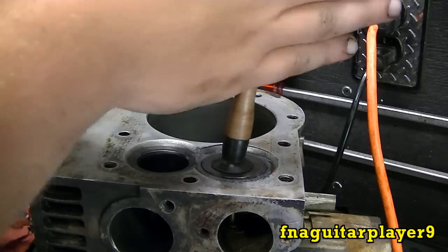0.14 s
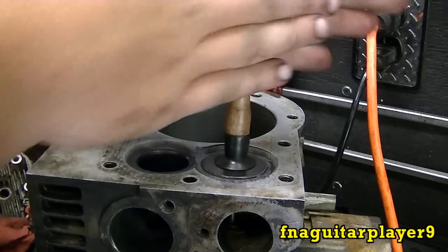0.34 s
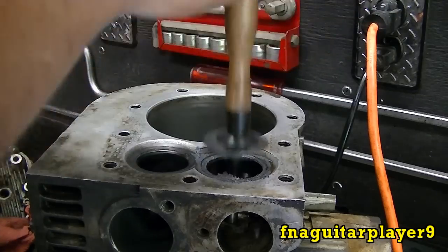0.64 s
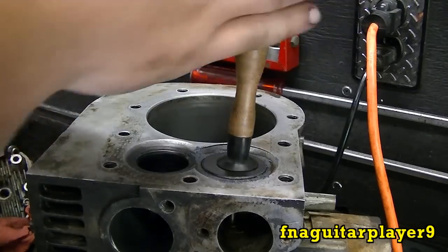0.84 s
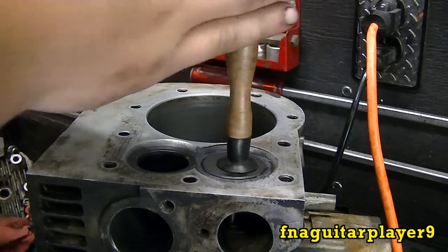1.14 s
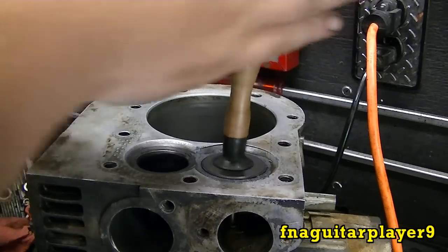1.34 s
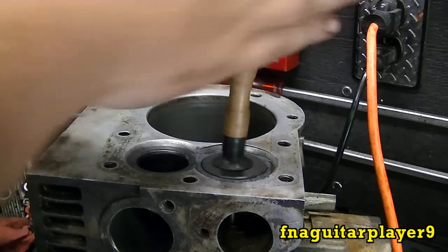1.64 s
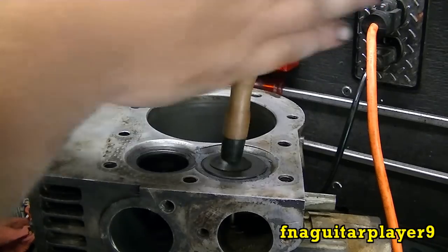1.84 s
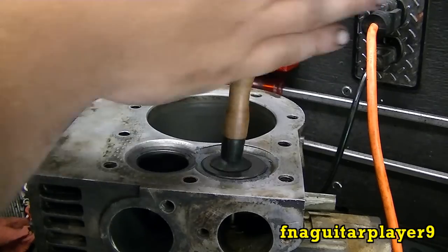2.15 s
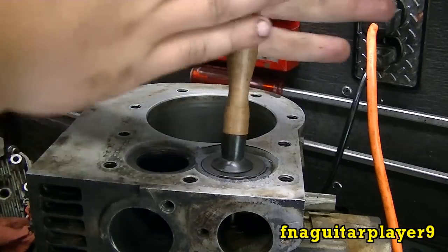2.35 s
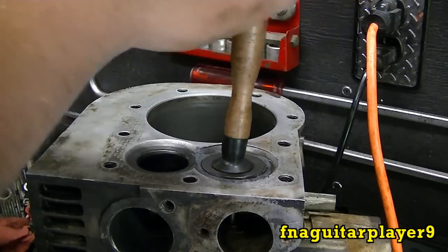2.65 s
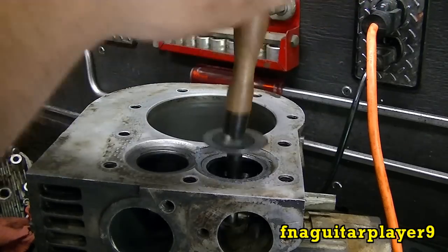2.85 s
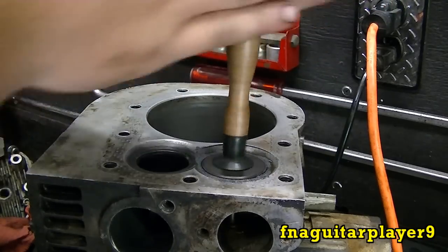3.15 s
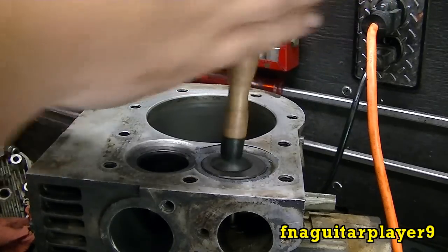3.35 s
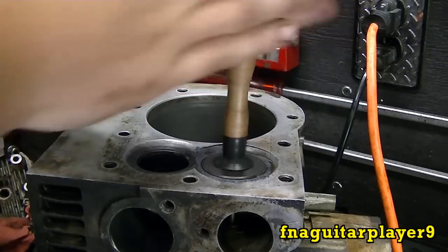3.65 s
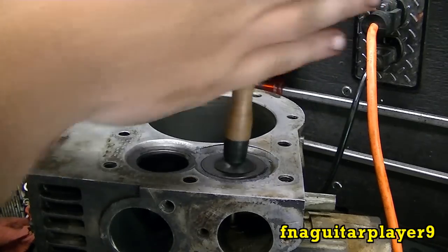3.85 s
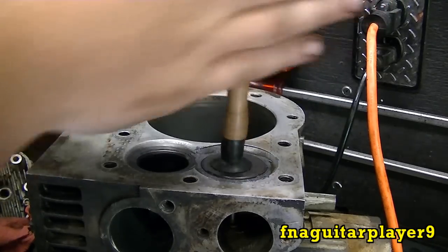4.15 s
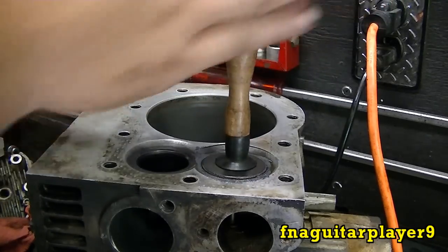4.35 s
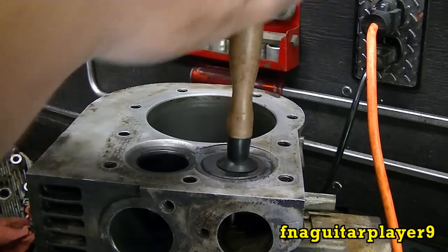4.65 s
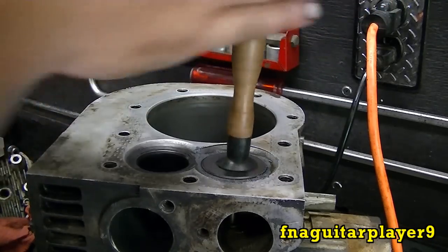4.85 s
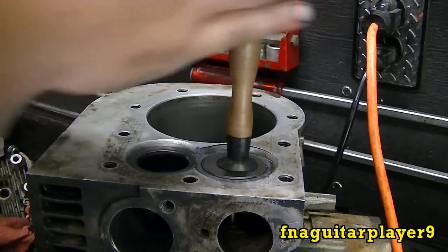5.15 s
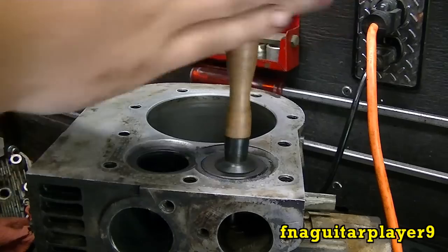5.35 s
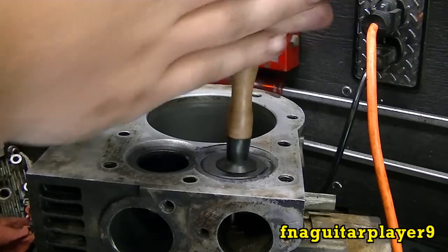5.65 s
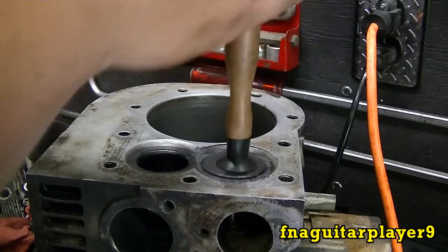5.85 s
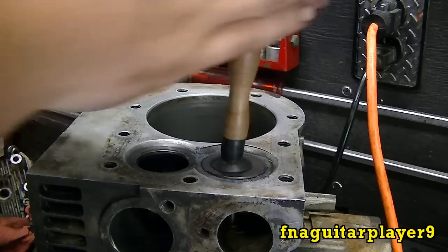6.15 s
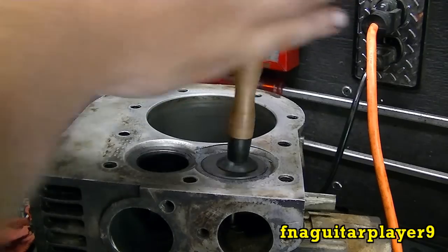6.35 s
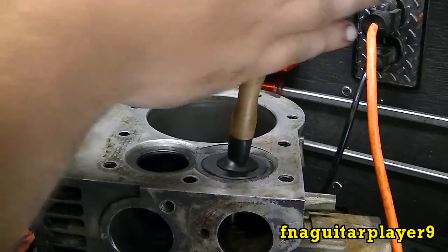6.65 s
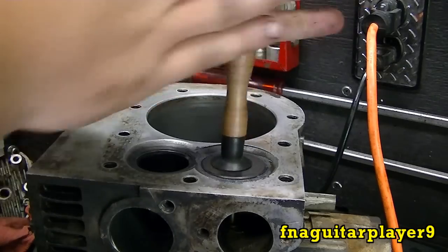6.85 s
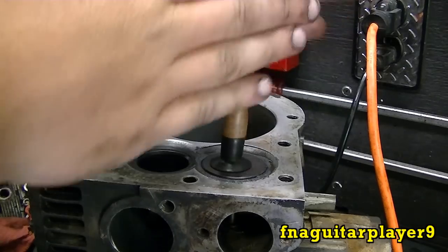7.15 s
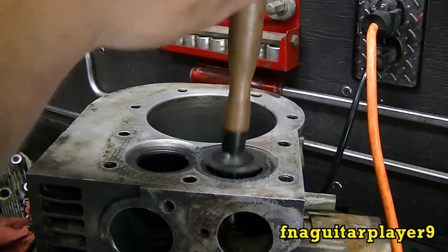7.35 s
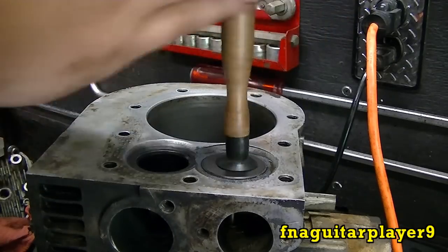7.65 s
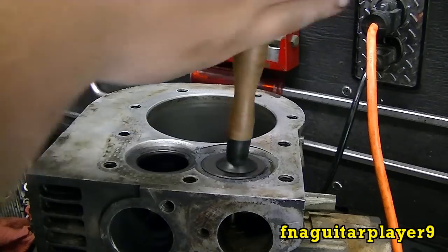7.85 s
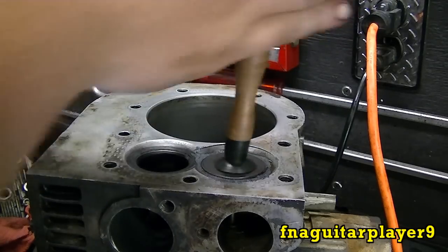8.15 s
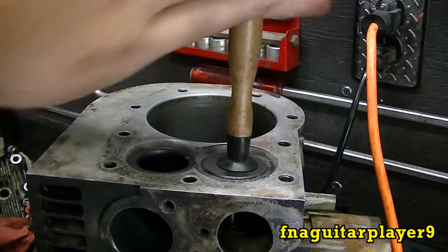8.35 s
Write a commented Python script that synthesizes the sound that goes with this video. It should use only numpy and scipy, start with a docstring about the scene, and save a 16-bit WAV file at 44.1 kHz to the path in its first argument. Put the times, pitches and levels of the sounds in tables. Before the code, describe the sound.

Close up in a small workshop, a valve is twisted back and forth on gritty paste, about seven or eight rasping strokes a second, with a ringing metallic edge. Every second or so the grinding stops; the valve lifts with soft knocks, its stem hisses in the guide, and it drops with a hard clack before the rasping resumes. Short room echoes, quiet air and a faint hum lie beneath.

```python
"""A gritty rasp swings back and forth: a stick spun between the palms laps an engine valve into its seat.
Each half turn crushes abrasive grit, which makes the valve and the block ring. Between bouts the valve
is lifted with soft knocks, its stem hisses along the guide, and it clacks back on to the seat.
Random grains and noise pass through filters shaped like the metal; short groans and chirps, a small
workshop's echoes, its still air and a faint hum are added. Both channels carry the same sound."""
import sys
import numpy as np
from scipy import signal
from scipy.fft import rfft, irfft
from scipy.io import wavfile
from scipy.ndimage import uniform_filter1d, minimum_filter1d

SR = 44100
rng = np.random.default_rng(int(sys.argv[2]) if len(sys.argv) > 2 else 0)


def generate_wav(signal):
    """Clip the signal to [-1, 1] and save it as 16-bit WAV at the path in sys.argv[1]."""
    frames = np.transpose(np.atleast_2d(signal))
    scaled = np.clip(frames, -1, 1) * 32767
    pcm = np.round(scaled).astype(np.int16)
    wavfile.write(sys.argv[1], SR, pcm)


N = 374850
TIME = np.arange(N) / SR  # s
SIZE = 16384  # samples in a filter response
HZ = np.maximum(np.arange(SIZE // 2 + 1) * SR / SIZE, 1)  # frequencies of the gain curves


def from_db(db):
    """Turn decibels into an amplitude factor."""
    return 10 ** (np.asarray(db) / 20)


def rms_one(x):
    """Scale a signal to an rms level of 1."""
    return x / np.sqrt(np.mean(x ** 2) + 1e-20)


def colour(points):
    """Gain at each frequency, drawn through (frequency [Hz], level [dB]) points."""
    hz, db = np.transpose(points)
    return from_db(np.interp(np.log(HZ), np.log(hz), db))


def above(edge_hz):
    """Gain of a steep high-pass."""
    return 1 / np.sqrt(1 + (edge_hz / HZ) ** 20)


def below(edge_hz):
    """Gain of a steep low-pass."""
    return 1 / np.sqrt(1 + (HZ / edge_hz) ** 20)


def sound_through(force, gain):
    """Filter that reacts as early as its gain curve allows (minimum phase); white noise keeps its power."""
    cepstrum = irfft(np.log(gain / gain.max() + 1e-5))
    # fold the second half on to the first, so that nothing sounds before its cause
    cepstrum[1:SIZE // 2] *= 2
    cepstrum[SIZE // 2 + 1:] = 0
    response = irfft(np.exp(rfft(cepstrum)))
    response = response / np.linalg.norm(response)
    return signal.oaconvolve(force, response)[:N]


def drift(rate):
    """Smooth random wandering: a new random value this many times a second, joined by straight lines."""
    knots = rng.standard_normal(N // 40)
    return np.interp(TIME * rate, np.arange(len(knots)), knots)


def grit(per_s, spread_db):
    """Grains crack at random moments, most small and a few large; rms 1."""
    sizes = from_db(spread_db * np.minimum(rng.exponential(1, N), 4))
    cracks = rng.random(N) < per_s / SR
    push_or_pull = rng.choice([-1, 1], N)
    return rms_one(cracks * sizes * push_or_pull)


def burst(start, rise_s, t60):
    """Envelope that rises, then dies away by 60 dB in t60 seconds."""
    age = np.clip(TIME - start, 0, 1)
    return (1 - np.exp(-age / rise_s)) * from_db(-60 * np.minimum(age / t60, 3))


def swelling(middle, length):
    """Bell-shaped envelope."""
    return np.exp(-np.minimum(((TIME - middle) / length) ** 2, 20))


def roaming(force, centres_hz, roam_db, rate):
    """The contact wanders, so each region of the spectrum is driven more, then less."""
    out = force
    for hz in centres_hz:
        band = signal.lfilter(*signal.iirpeak(hz, 4, fs=SR), force)
        wander_db = roam_db * np.clip(drift(rate), -2, 2)
        out = out + band * (from_db(wander_db) - 1)
    return rms_one(out)


# colour of the still air in the shop: (frequency [Hz], level [dB])
AIR_COLOUR = [(25, -35.5), (38, -21), (55, 0.5), (95, -1), (130, 4), (185, 3.5), (300, 4), (600, -3),
              (1400, -5), (3000, -8.5), (8000, -16), (11000, -19.5), (15500, -31)]


def still_air(air_db=-68):
    """The still air of the shop: steady coloured noise."""
    return from_db(air_db) * sound_through(rng.standard_normal(N), colour(AIR_COLOUR))


# faint steady tones in the shop: (frequency [Hz], rms level [dB])
HUM_TONES = [(60, -84), (95, -83), (180, -79), (378, -85)]


def hum():
    """Steady sine tones; the root of 2 turns an rms level into a peak."""
    return sum(np.sqrt(2) * from_db(db) * np.sin(2 * np.pi * hz * TIME) for hz, db in HUM_TONES)


# colour of the room's answer: (frequency [Hz], level [dB])
WALL_COLOUR = [(100, 9.5), (500, 7.5), (1500, -2), (4000, 2.5), (8000, -5), (15000, -10.5)]


def workshop(x, early_db=-12.5, early_t60=0.094, late_db=-14.0, late_t60=0.28):
    """Scattered reflections from bench and wall, then a short diffuse tail: two fading bursts of noise."""
    t = TIME[:SR]
    answer = 0
    for db, t60, first_s in ((early_db, early_t60, .004), (late_db, late_t60, .012)):
        echoes = rng.standard_normal(len(t)) * from_db(-60 * t / t60) * (t > first_s)
        answer = answer + from_db(db) * echoes / np.linalg.norm(echoes)
    walls = colour(WALL_COLOUR)
    wall_level = np.sqrt(np.mean(walls ** 2))  # puts back the level that the filter evens out
    return sound_through(signal.oaconvolve(x, answer)[:N], walls) * wall_level


def palms(hard_db=1.5, rock_db=-63, rock_at=0.4, rock_s=.03):
    """Half turns pressed at least this hard rock the block: a faint low thud, part of the way through."""
    push = sum(from_db(rock_db + force_db) * swelling(start + rock_at * (end - start), rock_s)
               for start, end, force_db, swell_db in HALF_TURNS if force_db >= hard_db)
    thud_colour = colour([(10, 1.5), (35, -2), (80, -3.0), (160, -14), (600, -40)])
    return sound_through(push * rng.standard_normal(N), thud_colour)


# the rubber cup groans as it twists on the valve:
# (middle [s], half length [s], frequency [Hz], level before a shared trim [dB])
CUP_GROANS = [(.98, .016, 255, -53), (1.16, 0.045, 375, -52.5), (1.35, 0.019, 232, -51),
              (3.1, 0.051, 370, -51), (3.23, .02, 322, -50)]
# the stem sings briefly in its guide:
# (middle [s], half length [s], frequency [Hz], level before a shared trim [dB])
STEM_CHIRPS = [(5.97, 0.009, 4050, -60), (7.43, 0.015, 4100, -49.5)]


def rubbing(rows, width_hz, rub_db):
    """Stick and slip, made from noise, swell and fade in one narrow resonance."""
    out = 0
    for middle, length, hz, db in rows:
        slips = rng.standard_normal(N) * swelling(middle, length) * from_db(db + rub_db)
        resonance = 1 / (1 + (2 * (HZ - hz) / width_hz) ** 2)
        out = out + sound_through(slips, resonance)
    return out


# resonances of valve and block: (frequency [Hz], width [Hz], height above the broad response [dB])
ENGINE_RESONANCES = [(843.0, 36.0, 18.0), (1391.0, 42.0, 25.0), (1442.0, 54.0, 24.5), (1535.0, 70.0, 16.5),
                     (1739.0, 58.0, 15.5), (1966.0, 106.0, 11.5), (2096.0, 70.0, 9.8), (2499.0, 30.0, 8.4),
                     (2790.0, 44.0, 11.5), (3126.0, 55.0, 11.0), (3231.0, 24.0, 3.8), (3315.0, 65.0, 6.8),
                     (3871.0, 24.0, 8.0), (3972.0, 33.0, 10.8), (4045.0, 73.0, 12.7), (4352.0, 24.0, 5.6),
                     (4424.0, 110.0, 5.9), (4966.0, 81.0, 5.3), (5343.0, 29.0, 6.4), (5455.0, 37.0, 6.6),
                     (5905.0, 105.0, 6.6), (6731.0, 34.0, 9.9), (6956.0, 162.0, 5.0), (7296.0, 28.0, 7.2),
                     (7547.0, 74.0, 5.9), (7768.0, 136.0, 6.7), (7900.0, 50.0, 7.7), (9668.0, 78.0, 5.4),
                     (13757.0, 346.0, 9.3)]
# broad response of the metal: (frequency [Hz], level [dB])
METAL_COLOUR = [(150.0, -37.5), (225.0, -34.5), (420.0, -25), (570.0, -30.5), (1000.0, -28.5),
                (1600.0, -24), (2400.0, -17), (3600.0, -20.5), (5600.0, -19), (6500.0, -28),
                (7800.0, -25.5), (9400.0, -24.5), (11000.0, -32.5), (15500.0, -47)]


def engine_gain():
    """Resonance peaks standing on the broad response of the metal."""
    peaks = sum((from_db(2 * db) - 1) / (1 + (2 * (HZ - hz) / width) ** 2)
                for hz, width, db in ENGINE_RESONANCES)
    return colour(METAL_COLOUR) * np.sqrt(np.maximum(1 + peaks, .1))


# soft knocks as the valve pulls free of the paste or nudges its guide:
# (time [s], level before a shared trim [dB])
SOFT_KNOCKS = [(0.533, -50), (0.563, -40.5), (0.59, -44), (0.619, -47), (2.634, -31), (2.761, -52),
               (2.833, -41), (4.538, -48), (5.903, -36), (7.24, -38), (7.362, -36.5)]
# the stem slides up or down its guide: (middle [s], half length [s], level [dB])
STEM_SLIDES = [(0.628, 0.035, -51), (0.722, 0.037, -55.5), (2.893, 0.047, -58), (2.99, 0.04, -61.5),
               (4.597, 0.028, -61), (4.685, 0.03, -55), (5.973, 0.029, -56.5), (6.047, 0.023, -55),
               (7.425, 0.042, -57), (7.522, 0.029, -61)]
# colour of the sliding stem: (frequency [Hz], level [dB])
STEM_COLOUR = [(710, -48), (1200, -30.5), (1610, -12), (2260, -7.5), (2440, -14), (3680, -7.5),
               (3960, -3.5), (4690, -6.5), (5500, -5), (6370, -11.5), (7960, -16), (9620, -9),
               (15000, -22.5)]


def lifts(engine, nudge_db=-4.0):
    """The raised valve knocks softly and its stem hisses along the guide; grains of paste drive both."""
    knocks = sum(from_db(db + nudge_db) * burst(s, rise_s=0.0011, t60=0.058) for s, db in SOFT_KNOCKS)
    slide = sum(from_db(db) * swelling(s, length) for s, length, db in STEM_SLIDES)
    paste = grit(per_s=5000, spread_db=2.6)
    scuff = roaming(paste, np.geomspace(2000, 10000, num=6), roam_db=6.5, rate=66)
    knock_colour = colour([(200, 2), (550, 8.5), (1400, -1), (4000, -3.5), (12000, -2)])
    knocking = sound_through(knocks * paste, engine * knock_colour)
    sliding = sound_through(slide * scuff, colour(STEM_COLOUR))
    return knocking + sliding


# the valve drops on its seat:
# (time [s], strike level before a shared trim [dB], fin ring before a shared trim [dB])
VALVE_DROPS = [(0.7548, -8.5, -18), (3.0212, -11, -34), (4.6935, -12, -31), (6.0793, -9.5, -21),
               (7.5545, -10, -20)]
# colour of a drop against that of the grinding: (frequency [Hz], level [dB])
DROP_COLOUR = [(40, -2), (70, 3), (110, 5.5), (170, 11), (260, 6), (500, -1), (850, 1), (1400, 1),
               (2400, -2), (4000, -3.5), (8000, -3), (15000, 1)]


def drops(engine, clack_db=-1.0, strike_db=2.0, fins_db=1.0, fins_t60=0.11):
    """The valve strikes its seat and settles in a quick rattle of contacts; the cooling fins ring on briefly."""
    strike = np.zeros(N)
    for s, db, ring_db in VALVE_DROPS:
        strike[round(s * SR)] = from_db(db + strike_db)
    settle = sum(from_db(db) * burst(s, rise_s=.0003, t60=.046) for s, db, ring_db in VALVE_DROPS)
    rattle = settle * grit(per_s=7000, spread_db=1.5)
    fins = sum(from_db(ring_db + fins_db) * burst(s, rise_s=0.0045, t60=fins_t60)
               for s, db, ring_db in VALVE_DROPS)
    fin_colour = colour([(1400, -9.0), (2300, 2), (3700, 1.5), (7000, -13.0), (12000, -17)])
    clack = sound_through(strike + rattle * from_db(clack_db), engine * colour(DROP_COLOUR))
    ringing = sound_through(fins * rng.standard_normal(N), engine * fin_colour)
    return clack + ringing


def stick_speed(share, start_speed=0.45, end_speed=0.13, fastest_at=0.42):
    """Speed over a half turn (top speed 1): a quarter sine up to the top, another down to the stall."""
    share = np.clip(share, 0, 1)
    rising = start_speed + (1 - start_speed) * np.sin(np.pi / 2 * share / fastest_at)
    falling = end_speed + (1 - end_speed) * np.sin(np.pi / 2 * (1 - share) / (1 - fastest_at))
    return np.maximum(np.where(share < fastest_at, rising, falling), 1e-3)


# half turns of the stick:
# (start [s], end [s], hand pressure [dB], swell of the pressure from early to late [dB])
HALF_TURNS = [(-0.03, 0.089, -3.5, 1.5), (0.109, 0.218, -6, -2), (0.227, 0.374, -3.0, 0.5),
              (0.932, 1.05, -1, -1), (1.071, 1.22, 2.5, 1), (1.242, 1.357, 0, 0.5),
              (1.373, 1.502, 4.0, 3.5), (1.524, 1.655, -1.5, -3.5), (1.664, 1.805, 3.0, 3.5),
              (1.827, 1.939, -1.0, 1.5), (1.964, 2.097, 4, 3.5), (2.118, 2.23, -0.5, 3),
              (2.245, 2.418, 2.0, -2), (3.032, 3.16, 0.5, 6), (3.189, 3.328, -1.5, -1.5),
              (3.343, 3.468, 5.5, 3), (3.498, 3.614, 1.5, -3), (3.628, 3.751, 4, 2), (3.775, 3.887, 0.5, 4),
              (3.904, 4.017, 3.5, 3.5), (4.043, 4.16, -5, -11.5), (4.161, 4.307, 3, 5),
              (4.786, 4.837, 0, 0), (4.874, 5.008, -1.5, -6.5), (5.018, 5.151, 2.5, 4),
              (5.178, 5.3, -2, -5.5), (5.309, 5.445, 1.5, 3.5), (5.464, 5.588, -4, -5),
              (5.593, 5.739, 0, 2), (6.182, 6.3, 2.0, -3), (6.327, 6.461, -0.5, 2),
              (6.474, 6.598, 1.5, 2.5), (6.622, 6.736, -3, 0.5), (6.751, 6.887, 1, 4.5),
              (6.915, 7.026, -4, -1), (7.039, 7.156, 0.5, 2.5), (7.625, 7.746, 0.5, -5),
              (7.771, 7.907, -1.5, -0.5), (7.917, 8.051, 0.5, 4), (8.074, 8.191, -3, -4),
              (8.202, 8.361, -1.0, -1)]
# how the parts of the rasp answer, by name: (level [dB], rise with pressure [dB per dB],
# power of the speed [no unit], fresh paste [dB], wear [dB per s], rise with treble [dB per dB],
# change from early to late in a half turn [dB])
RASP_PARTS = {"low rub": (-54, 1.22, 0.03, 6.5, -1.31, -.3, -3),
              "block": (-46.5, 1.64, 0.27, 3, -0.37, 0.0, -2),
              "valve": (-28, 1.0, 0.64, 0.6, -0.02, -0.07, 0.3),
              "hiss": (-32.5, 0.49, 1.28, -7.5, 0.49, 1.56, 2.4),
              "stem": (-43.5, 1.37, 2.0, -9, 1.42, 2.04, -2)}
# level of the treble in the rasp: (time [s], level [dB])
TREBLE_LEVEL = [(0, 0.5), (.25, -1.5), (.98, 2), (1.14, 2), (1.3, 0), (1.6, 1.3), (2.3, 0.5), (3.42, 2),
                (3.55, 0.5), (3.7, 1.5), (4.2, 0), (5.1, 2), (5.65, -0.5), (6.4, 2), (6.9, 0), (7.1, -1.5),
                (7.85, 0.5), (8.3, -0.5)]
BITE_S, STOP_S = .0015, 0.0029  # attack of a half turn, release after its stall
GRIP_DB, GRIP_S = 4.0, 0.017    # extra force as the resting paste breaks loose, and its fading time
FRESH_S = .14                   # thinning time of the thick cushion of fresh paste after a drop


def turning(swell_limit=.65):
    """Strength of each part of the rasp, from hand pressure, stick speed and the state of the paste."""
    out = np.zeros((len(RASP_PARTS), N))
    fresh = sum((TIME > s) * np.exp(-np.abs(TIME - s) / FRESH_S) for s, db, ring_db in VALVE_DROPS)
    treble_db = np.interp(TIME, *np.transpose(TREBLE_LEVEL))
    for start, end, force_db, swell_db in HALF_TURNS:
        at = (TIME > start - BITE_S) & (TIME < end + 10 * STOP_S)
        t = TIME[at]
        share = (t - start) / (end - start)  # 0 at the start of the half turn, 1 at its end
        attack = np.minimum((t - start + BITE_S) / (2 * BITE_S), 1)
        gate = attack * np.exp(-np.maximum(t - end, 0) / STOP_S)
        grip_db = GRIP_DB * np.exp(-np.abs(t - start) / GRIP_S)
        late = np.clip(share - .5, -swell_limit, swell_limit)
        pressure_db = force_db + swell_db * late
        speed = stick_speed(share)
        for k, part in enumerate(RASP_PARTS.values()):
            db, follows, power, fresh_db, wear_db_per_s, follows_treble, late_db = part
            paste_db = fresh_db * fresh[at] + wear_db_per_s * t + follows_treble * treble_db[at]
            level_db = db + follows * pressure_db + grip_db + paste_db + late_db * late
            out[k, at] += gate * speed ** power * from_db(level_db)
    return out


# level of the block's ring, slowly changing from bout to bout: (time [s], level [dB])
BLOCK_LEVEL = [(.2, 2.5), (1.1, -2), (2.2, -2), (3.1, 4.5), (3.5, -3.5), (3.9, 1), (4.9, 1.5), (5.5, 0),
               (6.8, -2.5), (7.9, 1)]


def grinding(engine, judder_db=1.47):
    """Crushed grit drives block, valve and stem; the valve rides unevenly on the paste."""
    rub, block, valve, hiss, stem = turning()
    block = block * from_db(np.interp(TIME, *np.transpose(BLOCK_LEVEL)))
    uneven = rms_one(from_db(judder_db * drift(70)))
    flutter = rms_one(from_db(.8 * drift(260)))
    coarse = grit(per_s=6000, spread_db=2.6) * uneven * flutter
    fine = .6 * coarse + grit(per_s=8000, spread_db=2.8) * uneven
    coarse = roaming(coarse, [260, 340, 450, 620, 850, 1100, 2000, 2600, 3300], roam_db=2.0, rate=30)
    fine = roaming(fine, np.geomspace(4000, 13500, num=7), roam_db=2.4, rate=26)
    stem_grit = grit(per_s=10000, spread_db=6.5) * uneven
    stem_zone = above(6720) * below(8380)
    outside_stem = np.sqrt(1 - stem_zone ** 2)  # the hiss leaves the stem's zone free
    return (sound_through(coarse * rub, engine * above(175) * below(636))
            + sound_through(coarse * block, engine * above(658) * below(972))
            + sound_through(coarse * valve, engine * above(936) * below(3750))
            + sound_through(fine * hiss, engine * above(3600) * outside_stem)
            + sound_through(stem_grit * stem, engine * stem_zone))


def scene():
    """The work and its echoes, the air and the hum reach both channels alike."""
    engine = engine_gain()
    groans = rubbing(CUP_GROANS, width_hz=110, rub_db=3.0)
    chirps = rubbing(STEM_CHIRPS, width_hz=110, rub_db=-4.5)
    work = grinding(engine) + drops(engine) + lifts(engine) + palms() + groans + chirps
    return np.tile(work + workshop(work) + still_air() + hum(), (2, 1))


def record(dry, ceiling_db=-13.6, release_db_per_s=5000, cutoff_hz=15900):
    """A very quick limiter holds the loudest peaks down, then a steep low-pass cuts the top."""
    over_db = np.maximum(20 * np.log10(np.abs(dry[0]) + 1e-9) - ceiling_db, 0)
    # the cut jumps up with each peak and then falls at the release rate
    recovery = release_db_per_s * TIME
    cut_db = np.maximum.accumulate(over_db + recovery) - recovery
    # widen each cut by a few samples, then smooth it
    gain_db = uniform_filter1d(minimum_filter1d(-cut_db, size=15), size=15)
    low_pass = signal.ellip(12, .1, 90, cutoff_hz, fs=SR, output="sos")
    return signal.sosfilt(low_pass, dry * from_db(gain_db))


dry = scene()
out = record(dry)
generate_wav(out)
```